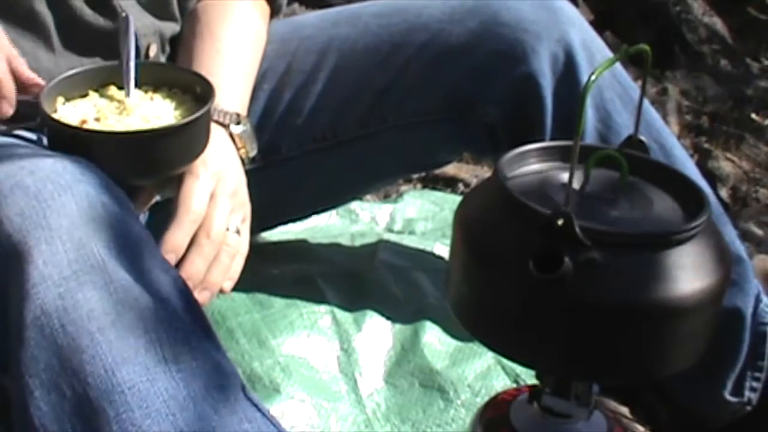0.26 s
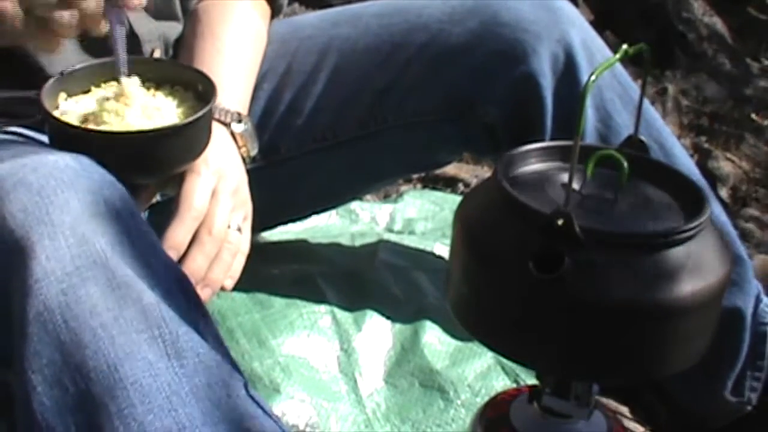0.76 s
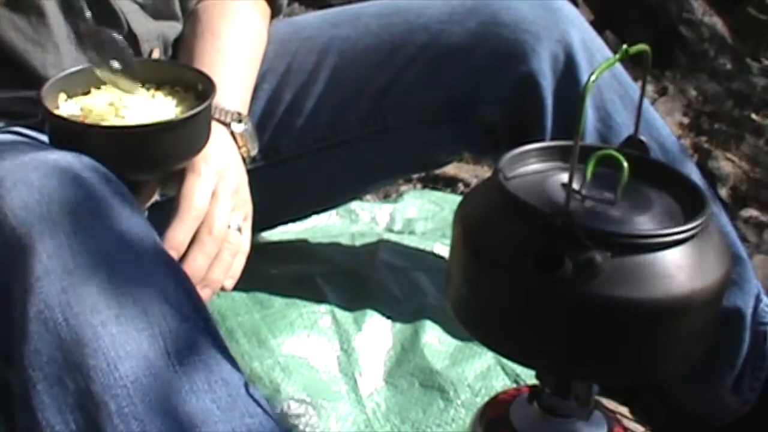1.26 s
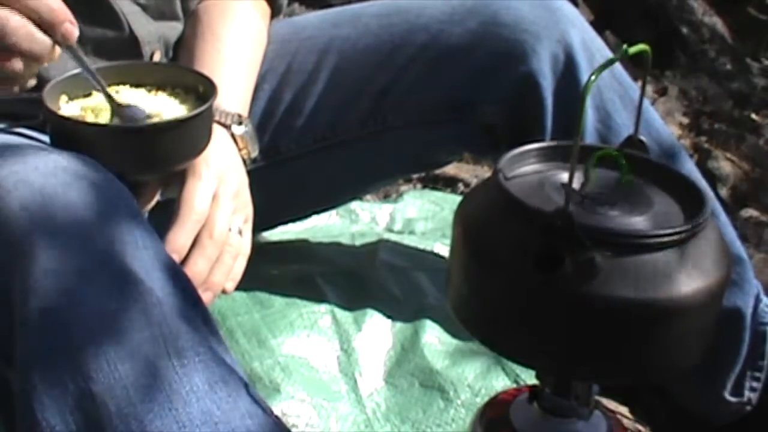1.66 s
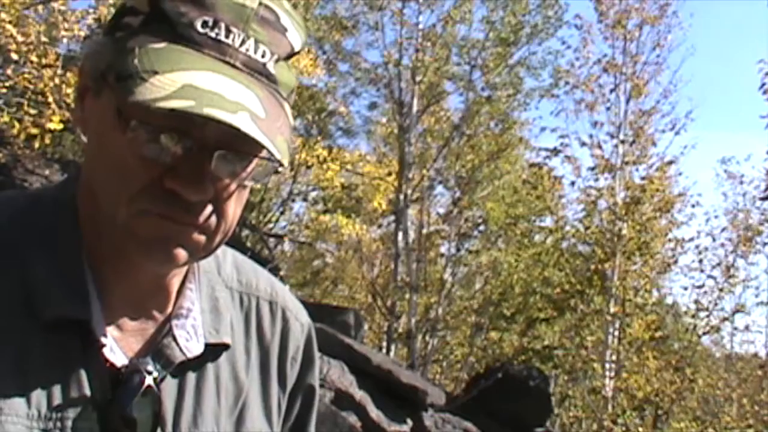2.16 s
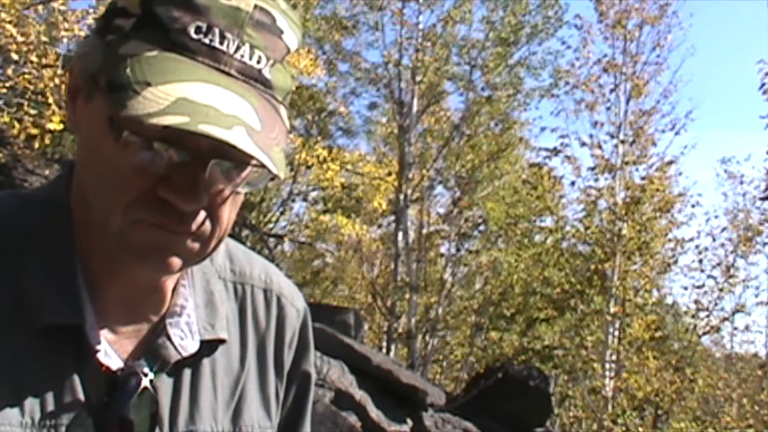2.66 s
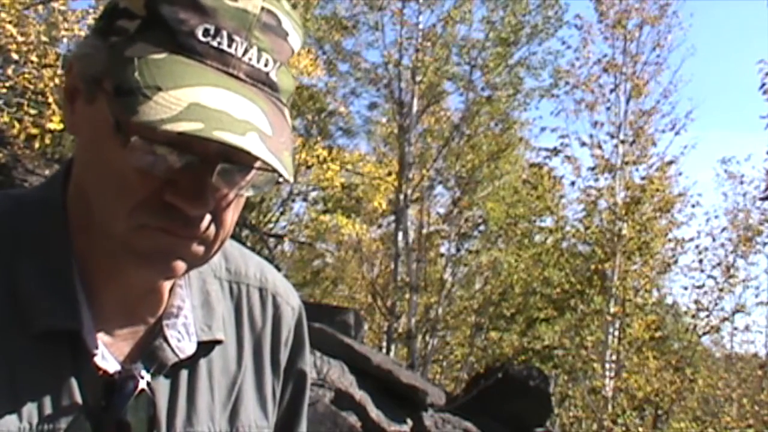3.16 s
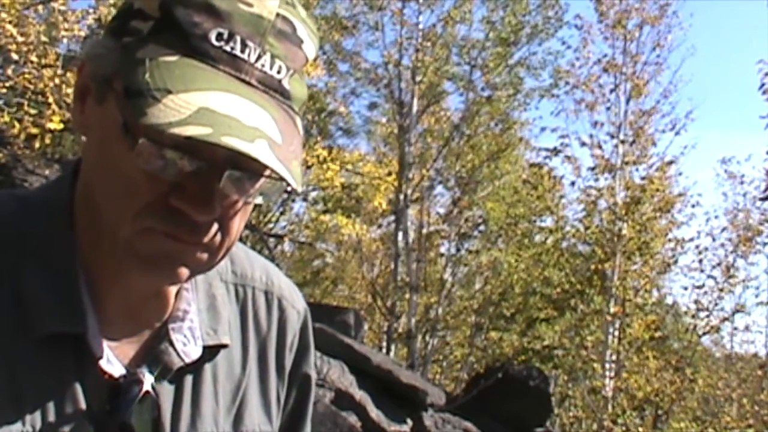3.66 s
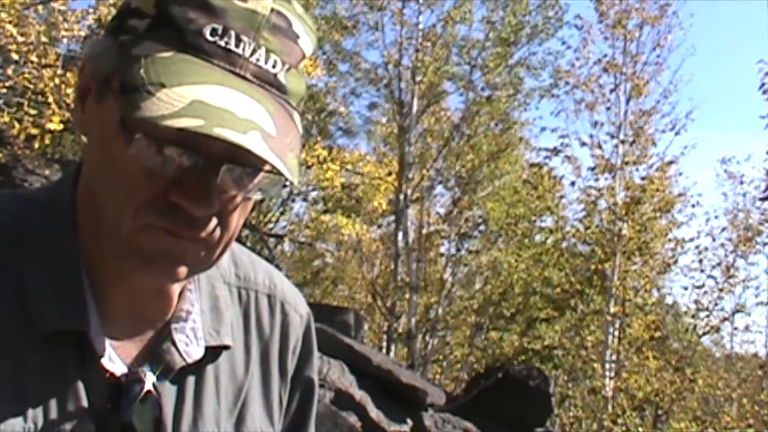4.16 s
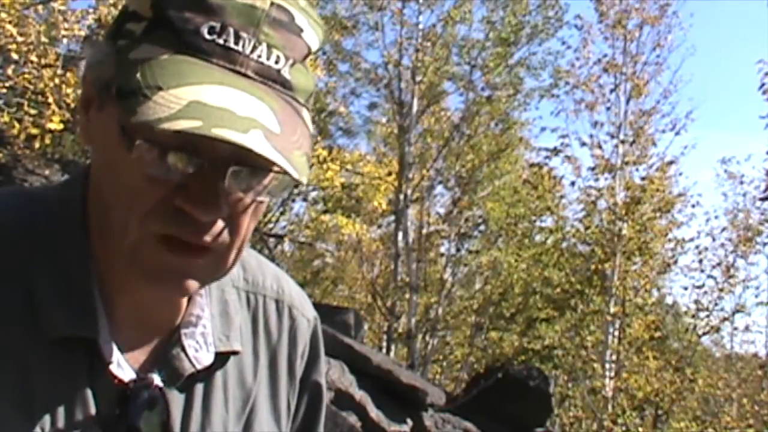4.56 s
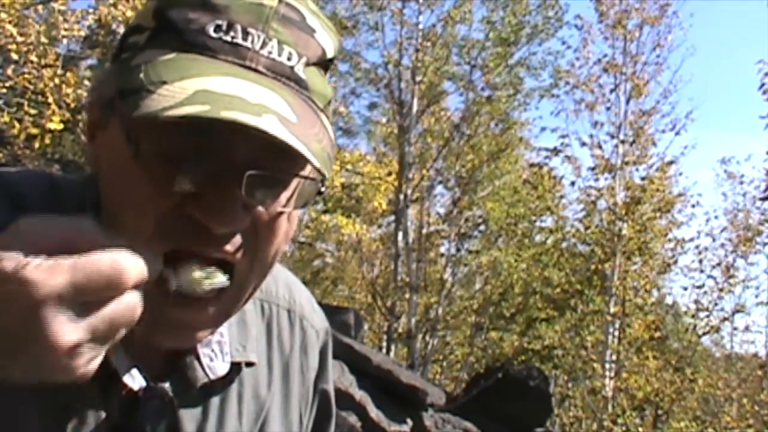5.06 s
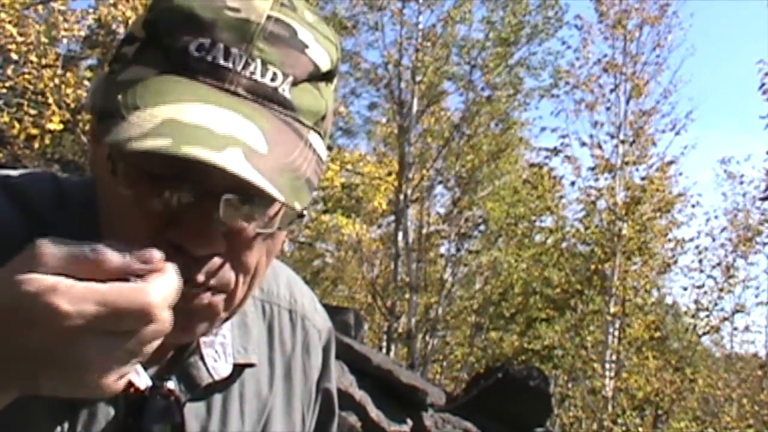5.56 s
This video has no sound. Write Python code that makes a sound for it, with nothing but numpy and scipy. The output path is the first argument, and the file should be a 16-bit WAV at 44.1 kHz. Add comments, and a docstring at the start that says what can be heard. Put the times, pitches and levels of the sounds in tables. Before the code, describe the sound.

A gas camp stove hisses steadily over a low flame roar, with a few sharp clicks of a spoon in a small metal pot.

```python
"""Camp stove and spoon

Outdoors, a gas stove burns under a kettle: the flame roars low, the gas jet hisses high, and the hot
burner ticks. A spoon clicks and scrapes in a small metal pot, and the eater's movements shade the hiss.
After two seconds the microphone is suddenly in another spot, where echoes from nearby surfaces make
the hiss hollower. Later the burner's tone sinks a little."""
import sys
import numpy as np
from scipy import signal
from scipy.fft import rfft, irfft
from scipy.io import wavfile
from scipy.ndimage import uniform_filter1d

SR = 44100
rng = np.random.default_rng(int(sys.argv[2]) if len(sys.argv) > 2 else 0)


def wrap_up_sound(samples):
    """Save the sound to the file named by the first command line argument, as 16-bit audio."""
    columns = np.atleast_2d(samples).T
    # keep every value between -1 and 1, then stretch to whole-number steps
    tamed = np.clip(columns, -1, 1)
    steps = np.round(tamed * 32767).astype(np.int16)
    wavfile.write(sys.argv[1], SR, steps)


N = 257103
HOP = 512  # samples from one frame (a short slice of sound) to the next
TIME = np.arange(N) / SR
FRAME_TIMES = np.arange(N // HOP + 6) * HOP / SR
BIN_HZ = np.fft.rfftfreq(4 * HOP, 1 / SR)  # the frequencies in a frame
MOVE_S = 1.985  # the microphone changes place

# BESIDE tables hold beside the pot. After the move, EARLY and LATE tables are blended.
# The sinking of the tone. Each row: time in seconds, share of LATE in the blend.
SINK = [(3.2, 0.4), (3.7, 0.87), (4.3, 1)]
# The burner's loudness. Each holds three levels in dB: roar, hiss, and the rush between them.
LEVELS_BESIDE = (-47, -46, -63)
LEVELS_EARLY = (-44, -43.5, -56.5)
LEVELS_LATE = (-46, -42, -61)
# The tone of the flame's roar, the jet's hiss and the rush. Each row: frequency in Hz, relative dB.
ROAR_BESIDE = [(24, -56), (40, -21), (49, -24), (102, -3.5), (170, 1), (220, -0.5), (304, -10.5),
               (370, -14), (466, -11), (657, -6.5), (760, -4), (890, -4.5), (1020, -12), (1200, -6.5),
               (1340, -11.5), (1570, -10.5), (1900, -27.5), (2000, -19), (2600, -44), (4400, -120)]
ROAR_EARLY = [(12, -47), (20, -18), (100, -7), (161, 1), (204, 2.5), (260, -9), (330, -4.5), (420, -15.5),
              (627, -8), (974, -7.5), (1140, -10.5), (1320, -23), (1610, -16.5), (2400, -31), (3120, -50),
              (5280, -120)]
ROAR_LATE = [(21, -46), (35, -20), (80, -9.5), (114, 0.5), (181, -8.5), (234, -8), (293, -15.5), (392, -13),
             (540, -8), (760, -8.5), (960, -16), (1150, -17.5), (1350, -19), (1570, -17.5), (1770, -23),
             (1930, -21), (2100, -26), (2730, -37), (4620, -120)]
HISS_BESIDE = [(2940, -56), (5000, -20), (5810, -11.5), (6760, -0.5), (7080, -5), (7420, -2), (8230, -0.5),
               (9480, -1.5), (9990, -5), (10400, -11.5), (10600, -12), (11200, -19), (12300, -27),
               (15000, -30), (15400, -28)]
HISS_EARLY = [(2940, -38.5), (5000, -25), (5340, -21), (6090, -3), (6730, -9), (7050, -4), (8430, 1.5),
              (9800, 0.5), (10300, -13.5), (10900, -13), (11900, -10), (13600, -23), (15400, -22)]
HISS_LATE = [(2940, -45), (5000, -26), (5240, -17), (6060, -6), (7390, -0.5), (8880, -4.5), (9990, -2),
             (10300, -8), (11300, -20), (11700, -22), (14400, -27), (15100, -26), (15400, -22)]
RUSH = [(1200, -25), (2000, -5.5), (2500, -0.5), (2900, -1), (3300, 0.5), (3700, -0.5), (4350, 0),
        (4720, 0.5), (5100, -1), (5600, 0.5), (7000, -14)]
# Narrow peaks and dips in the burner's sound at each microphone spot.
# Each row: frequency in Hz, width in Hz, boost or cut in dB.
PEAKS_BESIDE = [(3140, 140, 4.5), (4800, 110, 0), (6260, 64, -1), (6820, 170, 3.5), (7400, 130, -1),
                (7900, 300, -1.5), (9670, 270, 3.5), (10100, 100, 1)]
PEAKS_EARLY = [(1800, 55, -3), (2790, 46, 8.5), (3050, 90, -5), (3620, 70, 3), (5580, 60, 5),
               (6440, 100, -4), (7200, 110, -2.5), (10100, 97, 7)]
PEAKS_LATE = [(3160, 120, 2.5), (3450, 90, -2), (3950, 90, -1), (5780, 90, 0), (7020, 140, 3),
              (7460, 90, -0.5), (7580, 99, 3)]
# Echoes from nearby surfaces. Each row: delay in milliseconds, strength in dB.
ECHOES_BESIDE = [(2.37, -23), (3.0, -26)]
ECHOES_EARLY = [(2.11, -15), (3.55, -7.5)]
ECHOES_LATE = [(1.97, -26), (3.3, -23)]
# How wide the burner sounds. Each row: frequency in Hz, level of the sides against the middle in dB.
WIDTH_BESIDE = [(60, -24), (160, -27), (260, -16), (450, -9), (600, -14), (800, -21), (1250, -15.5),
                (2000, -6.5), (3300, -8), (5500, -9), (9000, -15), (15000, -27)]
WIDTH_EARLY = [(60, -25), (170, -24), (400, -11), (680, -17), (1000, -16), (1300, -8), (2000, -6),
               (3300, -13), (5500, -11), (9000, -18), (15000, -26)]
WIDTH_LATE = [(60, -29), (130, -26), (320, -9), (600, -15.5), (1000, -9.5), (2000, -7), (3300, -6),
              (5500, -10.5), (9000, -21.5), (15000, -29)]
# Its left-right balance. Each row: frequency in Hz, how much louder the left is in dB.
BALANCE = [(60, 0), (110, 0.0), (200, -0.5), (380, -0.5), (700, -0.5), (1290, -1.5), (2380, -1.0),
           (4400, -1), (8120, -0.5), (15000, 1)]
# The rise and fall of the hiss. Each row: time in seconds, change of level in dB.
HISS_SWELL = [(0.1, -0.5), (0.33, -2.8), (0.6, -0.5), (0.8, -2), (0.9, 2.2), (1.17, -0.5), (1.37, 1.7),
              (1.97, -0.1), (3.3, 0.5), (3.9, -0.44), (5.3, 0), (5.8, 0)]
# Gliding dips and peaks in the hiss (several paths each), the flame's hollow note, and a brief swell
# low in the rush. Each row of a path: time in seconds, frequency in Hz, boost or cut in dB.
HISS_DIPS = [
    [(0.1, 7100, -7), (0.65, 7350, -6), (1.0, 7200, -6), (1.35, 7440, 0), (1.9, 7400, -1.5)],
    [(0.35, 8700, 0), (0.7, 8850, -9), (1.0, 8750, -4), (1.25, 9000, 0), (1.8, 8990, -4)],
    [(0.1, 6200, 2), (0.6, 6170, -3), (1.1, 6370, 1), (1.45, 6560, -8), (1.75, 6550, -6), (2.0, 6700, -2)],
    [(3.3, 8950, -3), (3.55, 8800, -7), (3.9, 8800, 0), (4.1, 8650, -2), (4.4, 8400, 3), (4.7, 8700, -6.5),
     (5.0, 8950, -3), (5.35, 8860, -8), (5.6, 8600, -2), (5.8, 8350, -5)],
    [(3.55, 6500, 1), (3.9, 6260, -6), (4.15, 6200, 4)],
    [(4.8, 10400, -2), (5.35, 10080, -1), (5.8, 9950, -5)],
]
HISS_PEAKS = [
    [(0.1, 9400, 2), (0.45, 9150, 2), (0.7, 9550, -0.5), (1.0, 9550, 3), (1.2, 9400, 0)],
    [(1.1, 8400, 1), (1.35, 8480, 4.5), (1.9, 8300, 2.5), (2.8, 8500, 2), (3.25, 8150, 2), (3.6, 7700, -2)],
    [(1.1, 6900, 0), (1.35, 7000, 3), (1.8, 6980, 3.5)],
    [(3.2, 9700, 0), (3.5, 9750, 1.5), (4.0, 10000, 4), (4.4, 9900, 5), (4.9, 9850, 2), (5.35, 9550, 3),
     (5.8, 9230, 3.5)],
    [(4.1, 8300, -2), (4.4, 7900, 1), (4.8, 7900, 3), (5.2, 8300, 3.5), (5.5, 8150, 3), (5.75, 7500, 2)],
    [(3.9, 6900, -1), (4.25, 6820, 3), (4.8, 6600, -0.5), (5.4, 6300, 3), (5.8, 6430, 2)],
]
FLAME_NOTE = [(0.1, 800, 1.5), (0.9, 800, 1), (1.4, 776, 2.5), (2.1, 830, 0.5), (3.35, 710, 2),
              (4.0, 680, 2), (4.6, 640, 0), (5.8, 640, -0.5)]
RUSH_PEAK = [(3.45, 1900, -2), (3.7, 1800, 4), (4.15, 1800, -0.5)]
# The jet's whistles. Each row: frequency in Hz, width in Hz, boost in dB at full strength.
WHISTLES = [(3400, 140, 5.5), (4580, 90, 1.5), (4810, 160, 4), (6120, 110, 4), (6860, 130, 2)]
# How they change together. Each row: time in seconds, strength factor, pitch factor.
WHISTLE_COURSE = [(1.95, 0.2, 1), (2.45, 0.86, 0.96), (2.9, 0.65, 1.0), (3.13, 1, 1.0), (3.35, 0.9, 0.95),
                  (3.55, 0, 0.87)]
# A low puff of the flame. Each row: start in seconds, pitch in Hz, peak level in dB.
PUFFS = [(4.828, 109, -40)]
# The pot's ringing notes. Each row: pitch in Hz, relative level in dB, seconds to fade by 60 dB.
POT_NOTES = [(700, -4, .008), (1080, -10, .008), (1470, -7, 0.014), (1720, -3, 0.015), (2040, -7, 0.014),
             (2420, -3.5, .009), (2730, -4, 0.011), (3000, -6, 0.013), (3300, -4.5, 0.013),
             (3920, -6, 0.0095), (4940, 2, 0.015), (5560, -4, 0.013), (6570, 3, 0.012), (7040, 2, 0.012),
             (8350, -3.5, 0.0095), (9050, 0, 0.011), (10380, 1, 0.011), (11350, -5, 0.0095)]
# The spoon touching the pot. Each row: start in seconds, peak level in dB, centre of the tone in Hz,
# its spread in octaves, fade time of the scrape in seconds, share of scrape from 0 to 1.
SPOON_HITS = [(0.2200, -18.5, 4200, 0.86, .0004, 0.2), (0.2206, -23, 10500, .3, .001, .4),
              (0.2245, -14.5, 7100, 0.61, .0006, 0.22), (0.2250, -22, 2890, 0.24, 0.001, 0.25),
              (0.2265, -19, 9000, .55, 0.0006, 0.25), (0.683, -46, 3920, 0.08, 0.004, 0.79),
              (0.685, -42.5, 2940, 0.07, 0.003, 0.5), (0.763, -44.5, 2180, 0.13, 0.019, .95),
              (0.870, -47, 1750, 0.12, 0.006, 0.9), (0.876, -44.5, 2400, 0.16, 0.006, 0.9),
              (1.5873, -29.5, 2740, 0.37, .0005, 0.18), (1.5875, -38, 5560, 0.067, .001, .15),
              (1.5875, -33, 9200, .3, .0004, .2), (1.5878, -31.5, 820, 0.55, .0007, 0.15),
              (1.5892, -38, 1600, .3, .0006, .2), (1.652, -47, 4200, 0.3, .003, .7)]
# Ticks of the hot burner. Each row: start in seconds, peak level in dB, fade time in seconds.
TICKS = [(3.894, -37, .008), (4.2477, -37, .0016), (4.256, -38, .002)]


def burner(flutter_db=0.44, flicker_db=0.58, rush_swell_share=0.32, rush_lag_s=0.38):
    """The swirling flame roars, the slightly unsteady gas jet hisses, and a thin rush lies between."""
    roar_db, hiss_db, _ = over_time(LEVELS_BESIDE, LEVELS_EARLY, LEVELS_LATE).T
    _, _, rush_db = over_time(LEVELS_BESIDE, LEVELS_EARLY, LEVELS_LATE, rush_lag_s).T
    swell_db = follow(HISS_SWELL, FRAME_TIMES)[0]
    roar_db = roar_db + flutter_db * drift(frames=4)
    jet_db = flicker_db * drift(frames=4)
    hiss_db = hiss_db + jet_db + swell_db
    rush_db = rush_db + jet_db + rush_swell_share * swell_db
    peaks_db = over_time(*map(peaks_and_dips, (PEAKS_BESIDE, PEAKS_EARLY, PEAKS_LATE)))
    roar_shape = tone_over_time(ROAR_BESIDE, ROAR_EARLY, ROAR_LATE) + glides([FLAME_NOTE], width_hz=110)
    hiss_shape = tone_over_time(HISS_BESIDE, HISS_EARLY, HISS_LATE) + eater_shading()
    roar = band_power(roar_shape + peaks_db, roar_db, low_hz=40, high_hz=1600)
    hiss = band_power(hiss_shape + peaks_db, hiss_db, low_hz=6000, high_hz=11000)
    rush = band_power(spectrum(RUSH) + peaks_db, rush_db, low_hz=3500, high_hz=5200)
    boost_db = whistles() + glides([RUSH_PEAK], width_hz=390)
    return stereo_noise((roar + hiss + rush) * reflections() * gain_of(boost_db) ** 2)


def peaks_and_dips(rows):
    """Narrow peaks and dips, in dB, in the burner's sound at one microphone spot."""
    return sum(bump(hz, db, width_hz) for hz, width_hz, db in rows)


def whistles(waver_share=0.0083, flutter_share=.25):
    """The jet's faint whistles swell together, waver, sag in pitch and die away; a boost in dB."""
    strength, pitch = follow(WHISTLE_COURSE, FRAME_TIMES)
    total_db = 0
    for hz, width_hz, db in WHISTLES:
        wavering_hz = hz * pitch * (1 + waver_share * drift(frames=7))
        boost_db = db * strength * (1 + flutter_share * drift(frames=4))
        total_db = total_db + bump(wavering_hz, boost_db, width_hz)
    return total_db


def flame_puffs(length_s=0.038):
    """The flame flares for a few cycles of its lowest note."""
    t, out = np.arange(0, length_s, 1 / SR), np.zeros(N)
    for start_s, hz, db in PUFFS:
        add(out, start_s, gain_of(db) * np.hanning(len(t)) * np.sin(2 * np.pi * hz * t))
    return out


def spoon(crack_db=-5.5, crack_s=0.0014, crack_top_hz=12000):
    """Each touch is a knock and a scrape that briefly ring the hand-held pot, plus a dry crack."""
    t, out = np.arange(SR // 12) / SR, np.zeros(N)
    for start_s, db, centre_hz, octaves, scrape_s, share in SPOON_HITS:
        ring = 0
        for k, (hz, note_db, fade_s) in enumerate(POT_NOTES):
            nearness = np.exp(-.5 * (np.log2(hz / centre_hz) / octaves) ** 2)
            fade = gain_of(note_db - 60 * t / fade_s)
            ring = ring + (-1) ** k * nearness * fade * np.sin(2 * np.pi * hz * t)
        scrape, grit = rng.standard_normal((2, len(t)))
        scrape = scrape * np.exp(-t / scrape_s)
        force = (1 - share) * (t == 0) + share * scrape / np.linalg.norm(scrape)
        band_hz = np.minimum([centre_hz / 2 ** octaves, centre_hz * 2 ** octaves], crack_top_hz)
        crack = signal.lfilter(*signal.butter(2, band_hz, "band", fs=SR), grit * np.exp(-t / crack_s))
        pot = signal.fftconvolve(force, ring)[:len(t)]
        hit = unit_level(pot) + gain_of(crack_db) * unit_level(crack)
        add(out, start_s, gain_of(db) * hit / abs(hit).max())
    return out


def place_spoon(sound, lag_s=9e-6, pan_db=0.3, tail_db=-11.5, tail_s=0.067):
    """The spoon arrives later and weaker on the right; legs and ground scatter a short echo."""
    delayed = irfft(rfft(sound) * np.exp(-2j * np.pi * np.fft.rfftfreq(N, 1 / SR) * lag_s), N)
    direct = np.array([sound, delayed]) * gain_of([[pan_db], [-pan_db]])
    t = np.arange(SR // 10) / SR
    tail = rng.standard_normal((2, len(t))) * gain_of(-60 * t / tail_s)
    echo = signal.fftconvolve(sound[None], tail / np.linalg.norm(tail[0]), axes=1)[:, :N]
    return direct + gain_of(tail_db) * echo


def metal_ticks(band_hz=(3800, 8500)):
    """Hot metal gives short, dry snaps."""
    t, out = np.arange(SR // 20) / SR, np.zeros(N)
    for start_s, db, fade_s in TICKS:
        burst = rng.standard_normal(len(t)) * np.exp(-t / fade_s)
        snap = signal.lfilter(*signal.butter(1, band_hz, "band", fs=SR), burst)
        add(out, start_s, gain_of(db) * snap / abs(snap).max())
    return out


def eater_shading():
    """Narrow dips and broader peaks, in dB, sweep through the hiss as the eater moves."""
    return glides(HISS_DIPS, width_hz=110) + glides(HISS_PEAKS, width_hz=390)


def reflections(low_hz=1150, high_hz=10500, scatter_db=1.14):
    """Echoes ripple the tone; bass bends round the surfaces and the highest treble is soaked up."""
    reflected = BIN_HZ ** 2 / (BIN_HZ ** 2 + low_hz ** 2) / (1 + (BIN_HZ / high_hz) ** 4)
    ripple = over_time(comb(ECHOES_BESIDE), comb(ECHOES_EARLY), comb(ECHOES_LATE))
    return np.exp(2 * ripple * reflected) * gain_of(scatter_db * scatter() * np.sqrt(reflected)) ** 2


def comb(echoes, sway_ms=.007):
    """Each echo makes evenly spaced peaks and dips; its delay sways as the eater moves."""
    ripple = 0
    for delay_ms, db in echoes:
        delay_s = (delay_ms + sway_ms * drift(frames=50)) / 1000
        ripple = ripple + gain_of(db) * np.cos(2 * np.pi * BIN_HZ * delay_s[:, None])
    return ripple


def scatter(bins=6, frames=34):
    """Countless weak echoes leave fine, slowly changing ridges in the tone."""
    ridges = uniform_filter1d(rng.standard_normal((len(FRAME_TIMES), len(BIN_HZ))), bins, 1)
    return unit_level(uniform_filter1d(uniform_filter1d(ridges, frames, 0), frames, 0))


def stereo_noise(power):
    """Noise with the given power at each frame and frequency, nearly mono in the bass."""
    mid, side = rng.standard_normal((2,) + power.shape + (2,)).view(complex)[..., 0]
    side = side * gain_of(tone_over_time(WIDTH_BESIDE, WIDTH_EARLY, WIDTH_LATE))
    lean = gain_of(spectrum(BALANCE) / 2)
    spectra = np.array([(mid + side) * lean, (mid - side) / lean]) * np.sqrt(power)
    sound = signal.istft(spectra.transpose(0, 2, 1), nperseg=4 * HOP, noverlap=3 * HOP)[1][:, :N]
    return unit_level(sound) * np.sqrt(power.sum(1).mean())


def band_power(shape_db, level_db, low_hz, high_hz):
    """Turns a tone shape into power, with the given level between low_hz and high_hz."""
    power = gain_of(shape_db) ** 2 * np.ones((len(FRAME_TIMES), 1))
    inside = power[:, (BIN_HZ > low_hz) & (BIN_HZ < high_hz)].sum(1)
    return power * (gain_of(level_db) ** 2 / inside)[:, None]


def over_time(beside, early, late, lag_s=0):
    """Values for each frame: they jump with the microphone, then shift as the tone sinks."""
    sunk = follow(SINK, FRAME_TIMES - lag_s)[0][:, None]
    blend = (1 - sunk) * np.array(early) + sunk * np.array(late)
    return np.where(FRAME_TIMES[:, None] < MOVE_S, beside, blend)


def tone_over_time(beside, early, late):
    """Three tone tables turned into dB at each frame and frequency."""
    return over_time(spectrum(beside), spectrum(early), spectrum(late))


def glides(paths, width_hz, fade_s=.2):
    """Peaks or dips, in dB, that move along their paths and fade beyond both ends."""
    total_db = 0
    for path in paths:
        hz, db = follow(path, FRAME_TIMES)
        outside_s = np.maximum(path[0][0] - FRAME_TIMES, FRAME_TIMES - path[-1][0])
        total_db = total_db + bump(hz, db * np.clip(1 - outside_s / fade_s, 0, 1), width_hz)
    return total_db


def bump(hz, db, width_hz):
    """A rounded peak that has half its height in dB at width_hz to either side."""
    return np.asarray(db)[..., None] / (1 + ((BIN_HZ - np.asarray(hz)[..., None]) / width_hz) ** 2)


def drift(frames):
    """A random wander of typical size 1, smoothed over this many frames."""
    jitter = rng.standard_normal(len(FRAME_TIMES))
    return unit_level(uniform_filter1d(uniform_filter1d(jitter, frames), frames))


def spectrum(rows):
    """Fills in a table's dB at every frequency."""
    hz, db = np.transpose(rows)
    return np.interp(np.log(BIN_HZ + 1), np.log(hz + 1), db)


def follow(rows, t):
    """Fills in a table's columns at times t."""
    times, *columns = np.transpose(rows)
    return [np.interp(t, times, column) for column in columns]


def add(mix, start_s, sound):
    """Mixes a sound in at its start time."""
    part = mix[round(start_s * SR):][:len(sound)]
    part += sound[:len(part)]


def gain_of(db):
    """Turns decibels into a factor."""
    return np.exp(np.asarray(db) * np.log(10) / 20)


def unit_level(x):
    """Scales a signal to an average power of 1."""
    return x / np.sqrt(np.mean(x ** 2) + 1e-20)


def scene():
    """The stove in the middle, the spoon a little to the left."""
    return burner() + flame_puffs() + metal_ticks() + place_spoon(spoon())


def record(dry, whine_hz=15734, whine_before_db=-76, whine_after_db=-71, top_hz=15900):
    """A camera's thin whine joins in, louder after the move; the highest treble is cut off."""
    whine_db = np.where(TIME < MOVE_S, whine_before_db, whine_after_db)
    whine = gain_of(whine_db) * np.sqrt(2) * np.sin(2 * np.pi * whine_hz * TIME)
    low_pass = signal.firwin(1023, top_hz, window=("kaiser", 9), fs=SR)
    return signal.oaconvolve(dry + whine, low_pass[None], "same")


dry = scene()
out = record(dry)
wrap_up_sound(out)
```